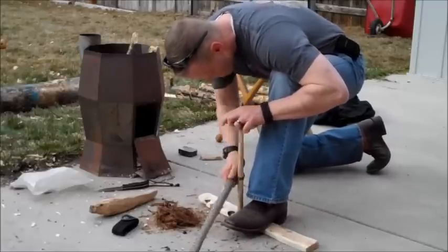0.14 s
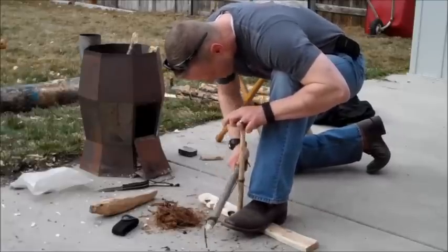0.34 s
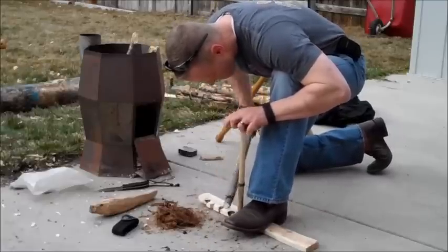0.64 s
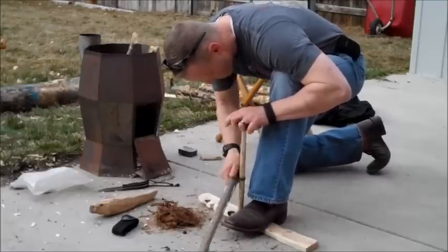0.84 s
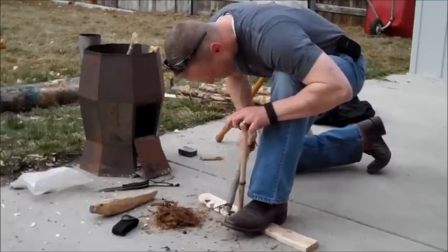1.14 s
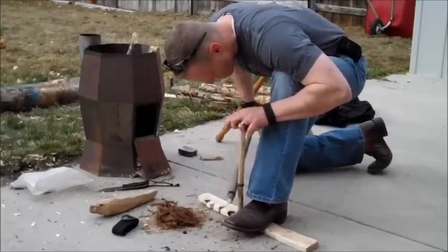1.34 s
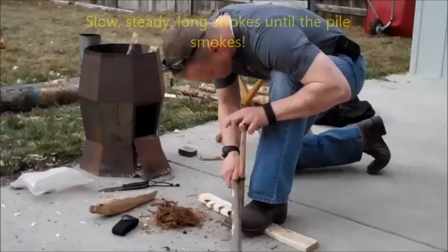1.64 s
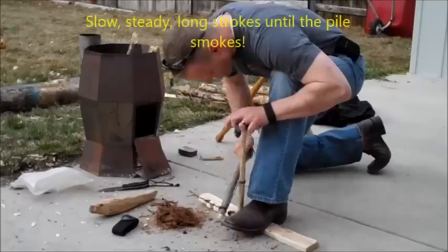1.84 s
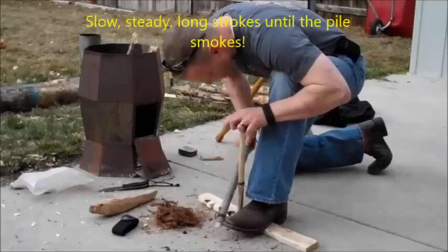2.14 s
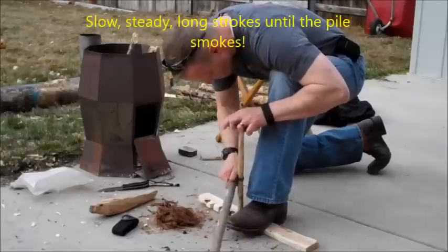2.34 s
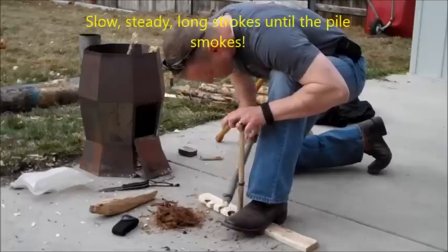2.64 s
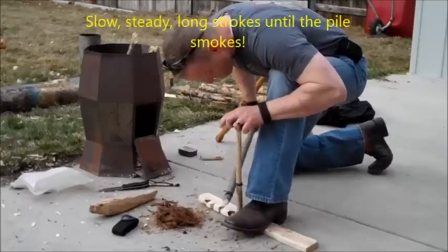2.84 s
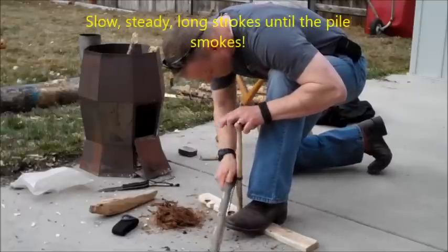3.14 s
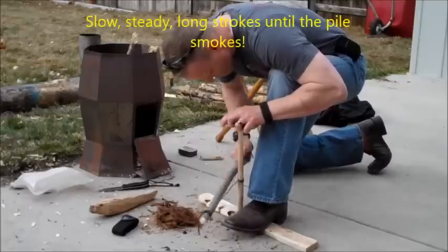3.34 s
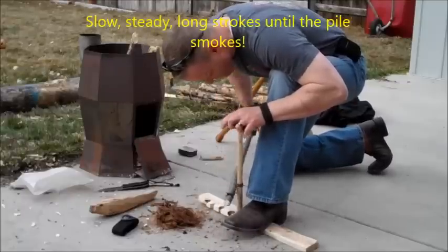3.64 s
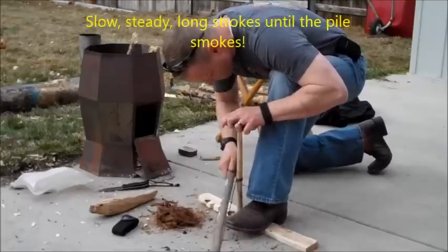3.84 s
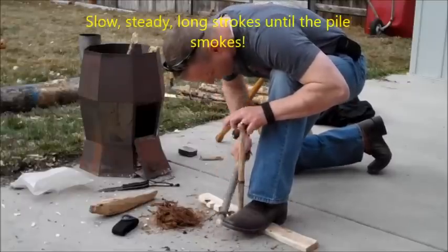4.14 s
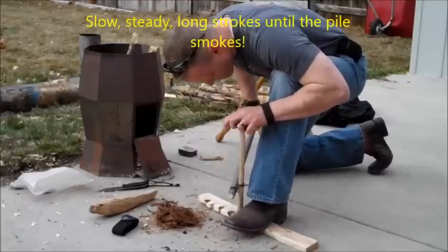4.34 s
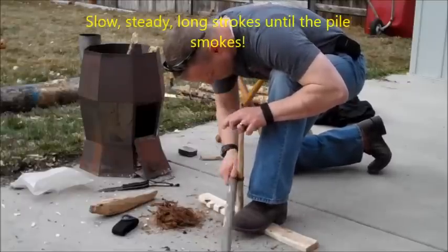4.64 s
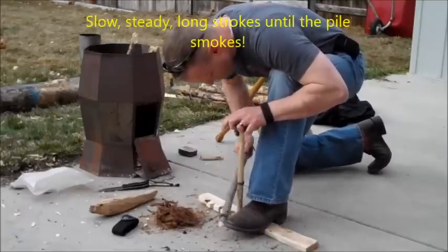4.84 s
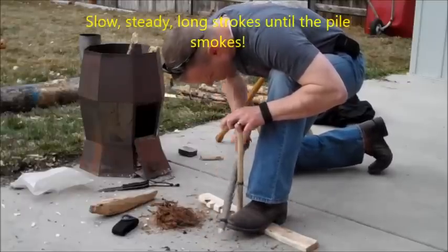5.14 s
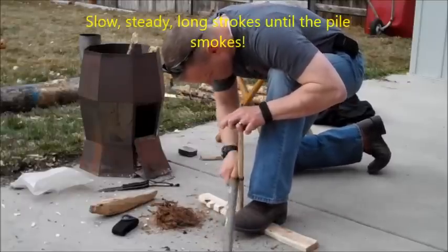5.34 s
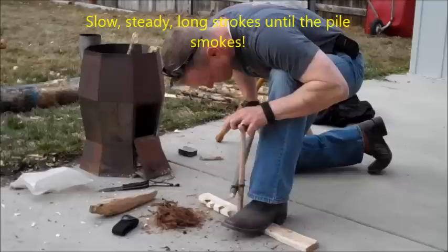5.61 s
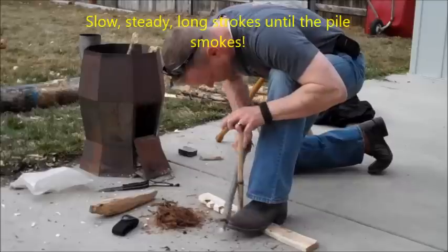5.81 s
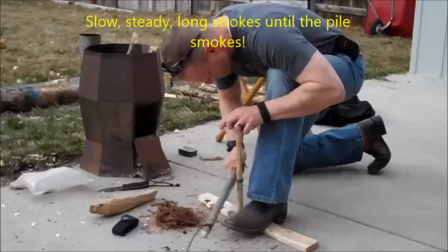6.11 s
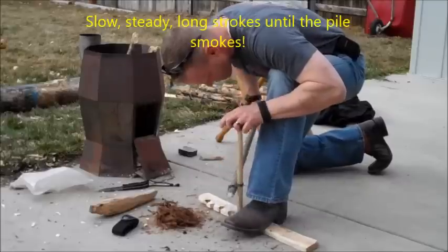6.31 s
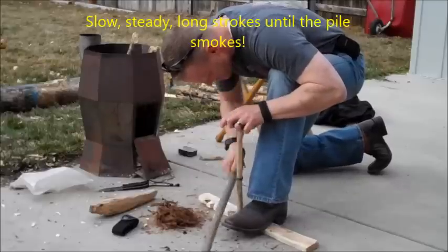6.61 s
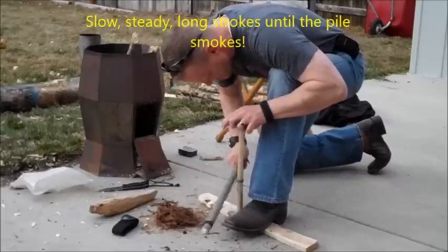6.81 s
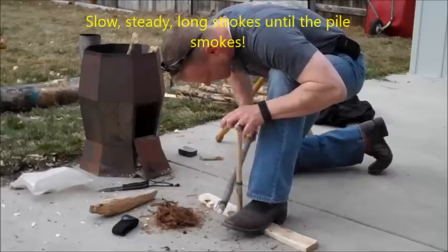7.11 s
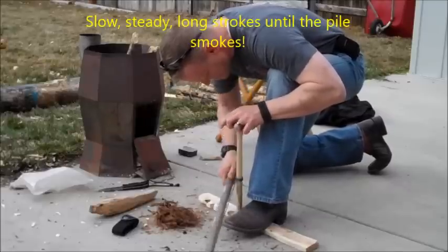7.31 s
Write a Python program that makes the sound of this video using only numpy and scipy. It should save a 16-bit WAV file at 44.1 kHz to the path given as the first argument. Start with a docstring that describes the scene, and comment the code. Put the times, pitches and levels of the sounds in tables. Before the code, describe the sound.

From 0 to about 7.5 seconds, a wooden spindle is bowed back and forth in a board on a concrete patio, already under way at the start and still going at the end. Strokes alternate about every 0.35 seconds: bright dusty hiss rises with bow speed, rough mid-pitched wooden chatter builds, then both drop briefly at each turn. Dry knocks of uneven strength rattle throughout; the hardest crack, at 0.8 seconds, briefly distorts. Thin high ticks fall near 0.2, 0.9 and 1.9, some very faint. Other clear knocks come near 1.5, 2.2, 6.1 and 7.2. A distant helicopter throbs low at about 23 beats per second, weakest near 1.3 and strongest around 6. Faint outdoor noise lies below. The stereo microphone is two metres away, mostly centred, with a little short wall reflection and no long echo.

```python
"""Concrete patio, a two-port microphone two metres from a wooden spindle that a bow spins in a board.
From the first moment the tip hisses through dust and chatters in board and spindle, pull and push in turn,
with knocks in its socket; the hardest clips the input near 0.8 s, and four thin ticks fall before 2 s.
A far helicopter rotor thuds throughout, weaker near 1.3 s and strongest near 6 s, over faint outdoor noise.
Clicks, noise and blows ring resonances, the rotor is a sum of cosines, and a house wall scatters a little back."""
import sys
import numpy as np
from scipy import signal
from scipy.fft import rfft, irfft, next_fast_len
from scipy.io import wavfile
from scipy.ndimage import uniform_filter1d

SR = 44100
rng = np.random.default_rng(int(sys.argv[2]) if len(sys.argv) > 2 else 0)


def bounce(signal):
    """Save signal as a 16-bit WAV file at the path given by the first command-line argument."""
    frames = np.transpose(np.atleast_2d(signal))
    limited = np.clip(frames, -1, 1)
    pcm = np.round(limited * 32767).astype(np.int16)
    wavfile.write(sys.argv[1], SR, pcm)


N = 329427  # samples, about 7.5 s

# resonances of the spindle, relative levels: [centre_hz, width_hz, level_db]
SPINDLE_MODES = [(1670, 220, 0.5), (2020, 320, -3), (2433, 304, 1.5), (2790, 240, -7.5), (3050, 227, -2.5),
                 (3330, 790, -20), (4270, 250, -14.5)]
# the spindle bending: [centre_hz, width_hz, level_db]
BENDING_MODES = [(986, 250, -7), (1194.5, 91, 2.5), (1410, 170, -7)]
# the wooden board: [centre_hz, width_hz, level_db]
BOARD_MODES = [(499, 160, -9), (590, 114, -0.15), (683, 96, 3), (827, 144, -4.5)]
# the concrete slab: [centre_hz, width_hz, level_db]
SLAB_MODES = [(148, 56, -3.5), (219, 49, 1.5), (277, 106, 1), (381, 226, -5.5)]
# hissing dust at the tip: [centre_hz, width_hz, level_db]
DUST_MODES = [(2950, 1140, -6.5), (4325, 347, -1.5), (4680, 550, -6), (5983, 606, -3.5), (7230, 290, -4.5),
              (8180, 1800, -16), (9460, 800, -14), (11300, 690, -24.5), (12300, 750, -29.5)]


def drilling():
    """One slipping contact shakes spindle, board and slab; dust hisses at the tip."""
    hiss_db, spindle_db, bend_db, board_db, slab_db = strokes()
    wobble = walk(40)  # the tip bears unevenly as it turns
    catch = catches(90, fade_s=0.0039)
    # chatter dies with the spin at each turn of the bow
    stall_db = 0.18 * np.minimum(hiss_db + 46, 0)
    spindle_db, bend_db, board_db = spindle_db + stall_db, bend_db + stall_db, board_db + stall_db

    # each part gets the shared slips plus a force of its own
    shared = slips(300, spread_db=1.5, smooth=0.45)
    spindle_force = shared + 1.2 * slips(700, spread_db=1.5, smooth=0.58)
    bend_force = 0.36 * shared + slips(150, spread_db=3.0, smooth=0.51)
    board_force = 0.6 * shared + slips(120, spread_db=0.5, smooth=0.4)
    slab_force = 0.44 * shared + rng.standard_normal(N)
    dust_force = 0.1 * shared + slips(3000, spread_db=6.0, smooth=0.86)

    spindle = unit(soft(ring(spindle_force, SPINDLE_MODES), hz=4200))
    bend = unit(soft(ring(bend_force, BENDING_MODES), hz=1800))
    board = unit(soft(ring(board_force, BOARD_MODES), hz=1170))
    slab = unit(ring(ring(slab_force, SLAB_MODES), [(252, 1000, 0)]))
    dust = unit(ring(dust_force, DUST_MODES))
    low_cut = signal.butter(2, 800, "high", fs=SR)
    spindle, bend = signal.lfilter(*low_cut, spindle), signal.lfilter(*low_cut, bend)

    # stroke level, trim, then the unsteadiness of the tip, all in dB
    return (dust * undb(hiss_db + 2.0 + 1.6 * wobble + 1.4 * walk(90) + 0.66 * catch)
            + spindle * undb(spindle_db - 1.0 + 0.63 * wobble + 2.5 * catch)
            + bend * undb(bend_db + 1.5 + 0.87 * wobble + 2.2 * catch)
            + board * undb(board_db - 2.5 + 2.0 * wobble + 1.8 * catch)
            + slab * undb(slab_db + 0.93 + 1.6 * wobble + 1.0 * catch))


# bow strokes, pull and push in turn; levels are before drilling() trims them:
# [turn_s, hiss_at_turn_db, hiss_db, hiss_slope_db over the stroke, chatter_full_s after the turn,
#  chatter_until_s after the turn, spindle_db, bending_db, board_db, slab_db]
STROKES = [(-0.1, -63, -41.5, 4, 0.066, 0.28, -32.5, -34, -32.5, -35.5),
           (0.26, -49, -38.5, 6, 0.14, .25, -37, -36.5, -40.5, -38),
           (0.61, -56.5, -40, -3, 0.1, 0.29, -30, -36.5, -35.5, -36.5),
           (0.96, -54.5, -40.5, 8, 0.2, 0.27, -35, -40.5, -44, -40.5),
           (1.32, -62, -42.5, -7, .14, 0.26, -34, -39, -33.5, -37),
           (1.69, -56, -38.5, 0, 0.21, .31, -30, -32.5, -36, -38),
           (2.07, -53, -42.5, -13, 0.094, 0.2, -29, -36, -33, -37.5),
           (2.4, -55, -37.5, 4, 0.25, 0.3, -33, -33, -37, -38),
           (2.81, -65, -41, -2, .12, 0.3, -32.5, -33.5, -28.5, -37.5),
           (3.2, -63, -38, 0, 0.25, 0.32, -34, -30, -34, -37),
           (3.62, -61, -42, -8, 0.11, .29, -36.5, -38.5, -30.5, -36.5),
           (3.98, -53.5, -37.5, 10, 0.26, 0.3, -33, -31, -34.5, -38.5),
           (4.36, -60, -41.5, -2, 0.13, .27, -32.5, -35, -30.5, -36),
           (4.71, -52, -36.5, -1, 0.14, 0.23, -33.5, -34.5, -34.5, -39),
           (5.05, -62, -40.5, 0.5, 0.11, 0.28, -37.5, -40, -37.5, -39),
           (5.37, -58, -37.5, -3, 0.15, 0.24, -33, -33, -32, -40.5),
           (5.715, -53.5, -40.5, -4, 0.083, 0.25, -34, -41, -33, -38),
           (6.04, -62, -37.5, 7, 0.2, .26, -29.5, -29, -32, -36.5),
           (6.4, -53.5, -39.5, -4.5, 0.12, 0.25, -32, -42.5, -33.5, -36),
           (6.73, -67, -38, 1, .12, 0.25, -39, -40.5, -48, -45),
           (7.07, -67, -39, 0, 0.11, 0.25, -35.5, -42, -37, -39.5),
           (7.4, -64, -41, 3, .2, .3, -33, -41, -40, -32)]
LAST_TURN_S = 7.74
# chatter at the turn, before the trims: [level_db] for spindle, bending, board, slab
REST_DB = [-52.5, -57, -55, -51.5]
# change of the chatter while it is full on a pull: [change_db] for the same four parts
PULL_SLOPE_DB = [-1, 3, -0.5, 3]
# the same on a push: [change_db]
PUSH_SLOPE_DB = [1.5, 1.9, 4, 0.71]
PULL_BUILD, PUSH_BUILD, FADE = 1.98, 1.51, 0.94  # ramp exponents: a build-up over 1 waits, then jumps
SPIN_POWER = 0.88  # hiss grows as this power of the bow speed
START_S, STOP_S = 0.035, 0.037  # dwell at each turn: time to pick up speed, and to lose it


def strokes():
    """Bow speed is half a sine per stroke and drives the hiss; spindle, bending, board, slab build and fade (dB)."""
    t = np.arange(N) / SR
    columns = np.transpose(STROKES)
    turns = np.append(columns[0], LAST_TURN_S)
    k = np.searchsorted(turns, t, side="right") - 1  # stroke under way
    turn, _, hiss_db, slope_db, full, until, *peak_db = columns[:, k]
    since, length = t - turn, np.diff(turns)[k]
    left, push = length - since, k % 2

    spin = np.abs(np.sin(np.pi * since / length)) ** SPIN_POWER
    spin = spin * (1 - np.exp(-(since / START_S) ** 2)) * (1 - np.exp(-(left / STOP_S) ** 2))
    still = undb(np.interp(t, turns[:-1], columns[1]))
    hiss = still + undb(hiss_db + slope_db * (since / length - 0.5)) * spin

    until = np.clip(until, full + 0.01, length - 0.01)
    build = np.clip(since / full, 0, 1) ** np.where(push, PUSH_BUILD, PULL_BUILD)
    fade = np.clip(left / (length - until), 0, 1) ** FADE
    grip = np.minimum(build, fade)
    through = np.clip((since - full) / (until - full), 0, 1) - 0.5
    levels = [20 * np.log10(hiss)]
    for rest, db, pull_slope, push_slope in zip(REST_DB, peak_db, PULL_SLOPE_DB, PUSH_SLOPE_DB):
        full_db = db + np.where(push, push_slope, pull_slope) * through
        levels.append(rest + grip * (full_db - rest))
    return levels


def slips(rate, spread_db, smooth):
    """Stick-slip force: random clicks of uneven but bounded size over a share of fine rubbing."""
    size = undb(spread_db * np.minimum(rng.exponential(size=N), 3.5)) * rng.choice([-1, 1], N)
    clicks = size * (rng.random(N) < rate / SR)
    return unit(clicks) + smooth * rng.standard_normal(N)


def catches(rate, fade_s):
    """The tip catches on the grain at random moments: the force jumps, then eases; its log has spread 1."""
    jumps = (rng.random(N) < rate / SR) * rng.exponential(size=N)
    force = signal.lfilter([1], [1, -np.exp(-1 / (fade_s * SR))], jumps)
    level = np.log(force + 0.26)
    return unit(level - level.mean())


# single knocks of the tip in its socket, loud and faint, some at the turns of the bow;
# levels are before the trims in knocks(): [start_s, crack_peak_db, board_share_db, crack_centre_hz]
KNOCKS = [(0.071, -10, -18, 2520), (0.108, -9.5, -13, 1530), (0.132, -9.5, -20, 1010),
          (0.453, -13.5, -12, 2350), (0.529, -20, -5, 2260), (0.769, -16, -9, 1240),
          (0.778, -6.5, -12, 1940), (0.807, 6, -26, 3160), (0.812, 0, -28, 1920), (0.866, -7, -20, 2260),
          (0.873, -7, -27, 1690), (1.141, -14, -22, 2370), (1.214, -12, -9, 1230), (1.442, -7.5, -12, 1670),
          (1.479, -12, -7.5, 2500), (1.509, -2.5, -20, 2520), (1.899, -6, -11.5, 2340),
          (1.925, -10, -9, 2450), (1.983, -5.5, -25, 2270), (2.025, -14.5, -21, 2470),
          (2.058, -12.5, -24, 1090), (2.151, -8, -19, 2360), (2.206, -3.5, -14, 2300),
          (2.216, -7, -14, 2080), (2.222, -5.5, -17, 1600), (2.278, -16, -3, 1690),
          (2.315, -13.5, -7, 1290), (2.661, -13, -11, 2340), (2.69, -12, -8, 2340), (2.933, -20, 1.5, 1950),
          (2.965, -10, -14, 1060), (3.055, -12.5, -8, 2150), (3.099, -13.5, -7, 1740),
          (3.46, -10.5, -25, 1170), (3.487, -12.5, -4.5, 2270), (3.702, -14, -6, 1790),
          (3.85, -15.5, -4, 2200), (4.205, -14.5, -9, 1160), (4.442, -19, -2, 2460),
          (4.503, -12, -4.5, 2590), (4.536, -7, -23, 2480), (4.566, -9, -9.5, 1970),
          (4.845, -11.5, -14, 1220), (4.907, -11.5, -18, 1900), (5.27, -12.5, -7, 1360),
          (5.302, -15, -10, 1580), (5.667, -7.5, -15, 1840), (5.872, -9.5, -17, 1170),
          (5.937, -7.5, -20, 1140), (6.054, -23, -19, 1150), (6.117, -20, -14, 1220),
          (6.144, -2.5, -22, 1850), (6.264, -6.5, -17, 2210), (6.273, -6, -26, 2450),
          (6.476, -16.5, -20, 2540), (6.529, -18, 1, 1540), (6.592, -9, -8, 1260), (6.626, -11, -11, 2250),
          (6.737, -23, -13, 1150), (6.805, -20.5, -22, 1190), (6.939, -12.5, -8, 1020),
          (7.087, -25.5, -6, 1020), (7.18, -21, 0.5, 1680), (7.207, -2.5, -12.5, 2400),
          (7.231, -9, -4, 1280), (7.244, -15, -2.5, 2140), (7.303, -19, -2, 1740),
          (7.333, -19.5, 0.5, 1260)]


def knocks():
    """A blow and a few ms of rattling, coloured about its own centre, ring spindle, board, dust and slab."""
    out, t = np.zeros(N + 2048), np.arange(2048) / SR
    for (s, db, board_db, hz), noise in zip(KNOCKS + taps(), rng.standard_normal((500, 2048))):
        push = noise * np.exp(-t / 0.0017) + 3.26 * (t == 0)
        crack = ring(push, BENDING_MODES + SPINDLE_MODES) + 1.73 * ring(push, [(hz, 800, 0)])
        crack = peak_one(soft(crack, hz=4640))
        thud = peak_one(soft(ring(push * np.exp(-t / 0.00076), BOARD_MODES), hz=1340))
        snap = peak_one(soft(ring(push, DUST_MODES), hz=5760))
        boom = peak_one(soft(ring(push, SLAB_MODES), hz=302))
        # harder blows snap brighter
        blow = crack + undb(board_db + 1.75) * thud + undb(1.06 * db - 9.5) * snap + undb(-30) * boom
        out[int(s * SR):][:2048] += undb(db - 3.0) * blow
    return out[:N]


TAP_GAP_S = 0.035  # mean gap
TAP_DB, TAP_BOARD_DB = 13.5, -6.5  # middle peak over the spindle chatter, middle board share; before trims
TAP_HZ = (1170, 2310)  # the two crack centres


def taps():
    """Further knocks at random moments follow the strength of the chatter; rows as in KNOCKS."""
    gap, size, share, pitch = rng.random((400, 4)).T
    s = np.cumsum(-TAP_GAP_S * np.log(1 - gap))
    chatter_db = np.interp(s, np.arange(N) / SR, strokes()[1])
    db = chatter_db + TAP_DB + 7.6 * (size - 0.5)
    board_db = TAP_BOARD_DB + 14.6 * (share - 0.5)
    hz = np.where(pitch < 0.5, *TAP_HZ)
    return [row for row in zip(s, db, board_db, hz) if row[0] < N / SR]


# thin high ticks: [start_s, peak_db, left_minus_right_db]
TICKS = [(0.2256, -13.5, -2), (0.8724, -41, 0.5), (0.922, -21, -4), (1.91, -11.5, -2)]


def ticks():
    """Short bright noise bursts, leaning to one side, each port with its own noise."""
    out, t = np.zeros((2, N)), np.arange(512) / SR
    for (s, db, pan_db), noise in zip(TICKS, rng.standard_normal((len(TICKS), 2, 512))):
        burst = ring(noise * np.exp(-t / 0.0014), [(9200, 7500, 0)])
        burst = peak_one(soft(burst, hz=9100))
        port_db = db + np.array([[pan_db], [-pan_db]]) / 2
        out[:, int(s * SR):][:, :512] += undb(port_db) * burst
    return out


# rate at which blades pass: [time_s, blade_rate_hz]
ROTOR_HZ = [(0, 23.29), (4, 23.28), (7.47, 23.235)]
# rotor loudness at the microphone: [time_s, level_db]
ROTOR_DB = [(0, -43), (1.3, -47.5), (2.4, -42), (3.6, -41), (6, -37), (7.47, -38.5)]
# multiples of the blade rate, relative levels: [multiple, level_db]
BLADE_MULTIPLES = [(1, -29), (2, -6.5), (3, -3.5), (4, 2.5), (5, 3), (6, -3.5), (7, -5.5), (8, -9.5),
                   (9, -15), (10, -8), (11, -19.5), (12, -19.5)]
ROTOR_FIRST_S = 0.0225  # first thud


def rotor():
    """Every blade passage of the far helicopter is one symmetric thud: all multiples peak together."""
    passages = np.cumsum(along(ROTOR_HZ)[0]) / SR - ROTOR_FIRST_S * ROTOR_HZ[0][1]
    thuds = np.zeros(N)
    for k, db in BLADE_MULTIPLES:
        wander_db = 0.17 * (k + 3.5) * walk(2.96)  # higher multiples waver more
        thuds += undb(db + wander_db) * np.cos(2 * np.pi * k * passages)
    return unit(thuds) * undb(along(ROTOR_DB)[0])


# spectrum of the outdoor floor, relative density: [pitch_hz, level_db]
AIR_SPECTRUM = [(25, -6), (60, 1), (120, -2), (300, -21), (700, -8), (1500, -10), (3000, -19), (6000, -41),
                (10000, -45), (14500, -58)]
AIR_DB = -50.5  # middle level


def outdoors():
    """Faint outdoor noise: coloured noise whose level slowly wanders."""
    air = unit(colour(rng.standard_normal(N), AIR_SPECTRUM))
    return air * undb(AIR_DB + 4.9 * walk(1.82))


# colour of the scatter that differs between the two ports, before a 0.5 dB cut: [pitch_hz, level_db]
WIDTH = [(60, -33), (110, -20), (200, -26.5), (370, -19.5), (690, -22), (1260, -15), (2320, -11.5),
         (4260, -10.5), (7840, -9.5), (14400, 4)]


def wall_scatter(direct):
    """The house wall returns dense fading echoes: a part common to both ports and a part opposite in them."""
    t = np.arange(SR // 4) / SR
    fade_s = np.array([[0.012], [0.03]])  # common, opposite
    echoes = rng.standard_normal((2, len(t))) * np.exp(-t / fade_s)
    mid, side = (signal.fftconvolve(direct, r / np.sqrt(np.sum(r ** 2)))[:N] for r in echoes)
    mid = undb(-14.5) * colour(mid, [(300, -7), (900, 6), (9000, -4.0)])
    side = undb(-0.5) * colour(side, WIDTH)
    return mid + np.array([side, -side])


def ring(x, modes):
    """A struck or rubbed body: sum of resonances of alternating sign."""
    out = 0
    for k, (hz, width, db) in enumerate(modes):
        out = out + (-1) ** k * undb(db) * signal.lfilter(*signal.iirpeak(hz, hz / width, SR), x)
    return out


def soft(x, hz):
    """A soft contact, as wood on wood, has no sharp edge: low-pass at hz."""
    return signal.lfilter(*signal.butter(2, hz, fs=SR), x)


def colour(x, points):
    """Shape a spectrum by (pitch_hz, level_db) points, joined along log frequency."""
    size = next_fast_len(len(x))
    hz, db = np.transpose(points)
    bins_hz = np.arange(size // 2 + 1) * SR / size
    gain_db = np.interp(np.log(bins_hz + 1), np.log(hz + 1), db)
    return irfft(rfft(x, size) * undb(gain_db), size)[:len(x)]


def walk(rate):
    """Random levels, rate per second, joined by straight slopes; spread a little under 1."""
    k = int(SR / rate)
    held = np.repeat(rng.standard_normal(N // k + 1), k)
    return 0.98 * uniform_filter1d(held, k)[:N]


def along(table):
    """Columns of a curve table, one value per sample."""
    s, *columns = np.transpose(table)
    return [np.interp(np.arange(N) / SR, s, c) for c in columns]


def undb(db):
    """Decibels to gain."""
    return 10 ** (np.asarray(db) / 20)


def unit(x):
    """Scale to rms 1."""
    return x / np.sqrt(np.mean(x ** 2))


def peak_one(x):
    """Scale to peak 1."""
    return x / np.abs(x).max()


def scene():
    """Direct sound is common to both ports; the wall's scatter and the ticks differ between them."""
    air = outdoors()
    direct = drilling() + knocks() + rotor() + air
    return direct + wall_scatter(direct) + ticks()


TOP_HZ = 14400  # highest pitch kept


def record(dry):
    """The microphone input clips just under full scale, then a steep low-pass cuts the top."""
    clipped = np.clip(dry, -0.98, 0.98)
    return signal.sosfilt(signal.ellip(12, 0.2, 90, TOP_HZ, fs=SR, output="sos"), clipped)


dry = scene()
out = record(dry)
bounce(out)
```